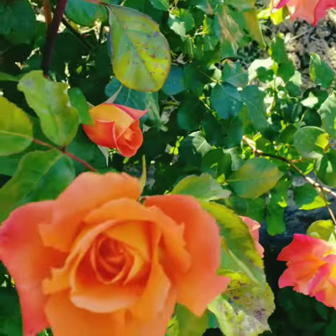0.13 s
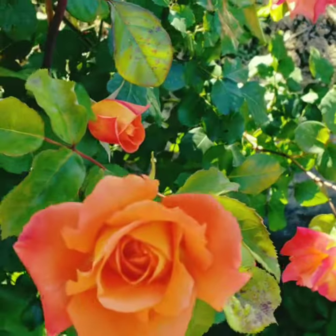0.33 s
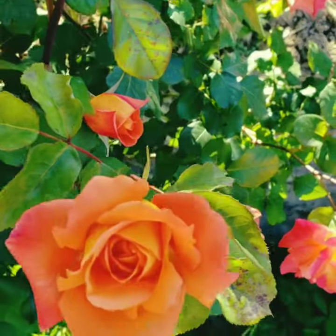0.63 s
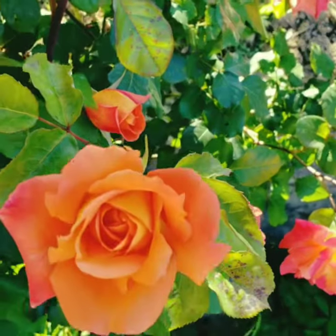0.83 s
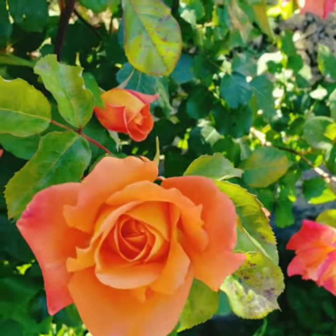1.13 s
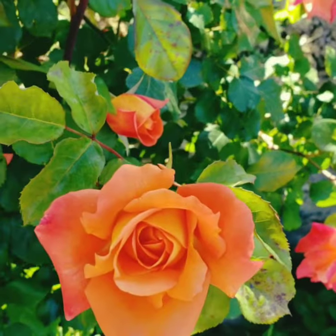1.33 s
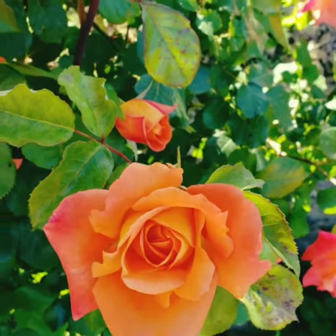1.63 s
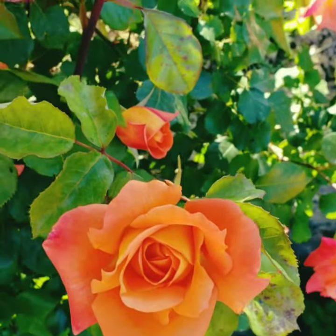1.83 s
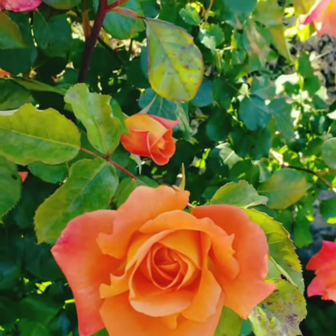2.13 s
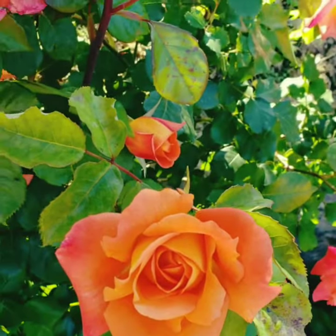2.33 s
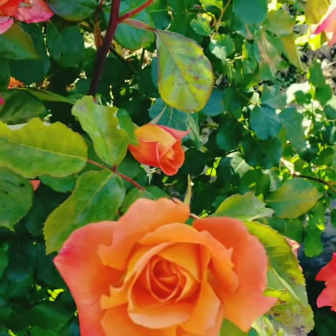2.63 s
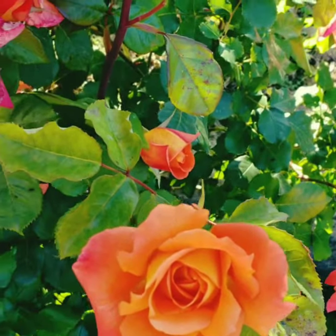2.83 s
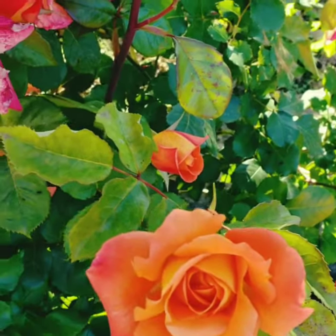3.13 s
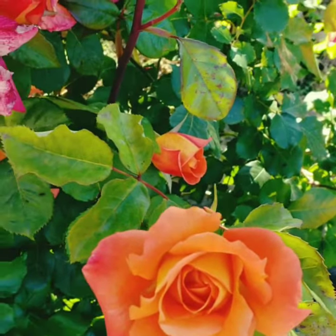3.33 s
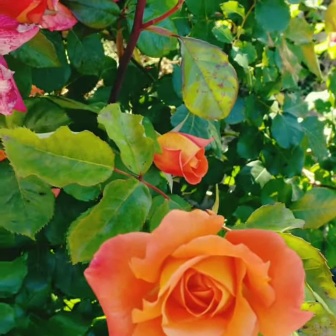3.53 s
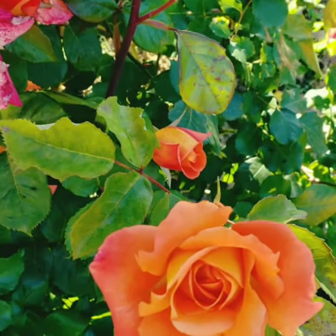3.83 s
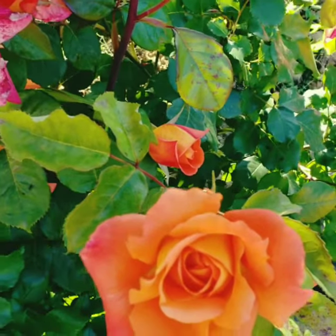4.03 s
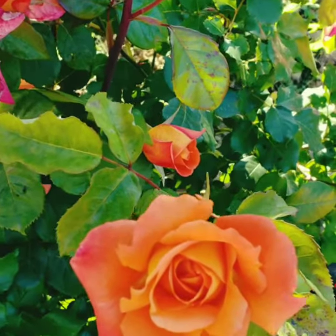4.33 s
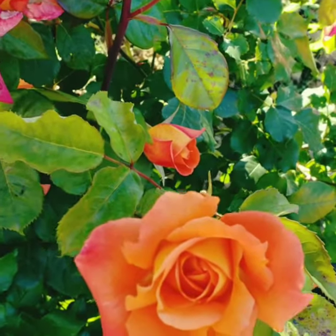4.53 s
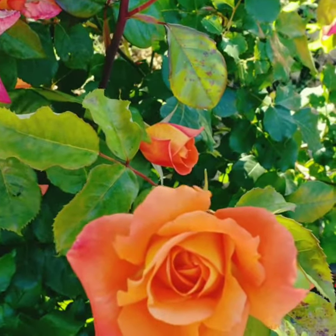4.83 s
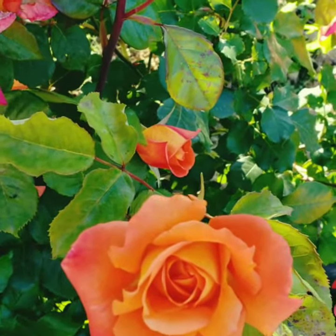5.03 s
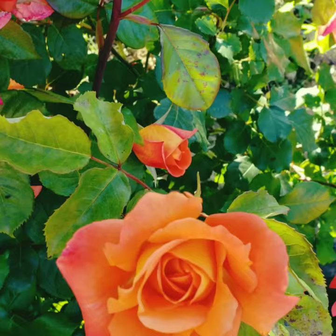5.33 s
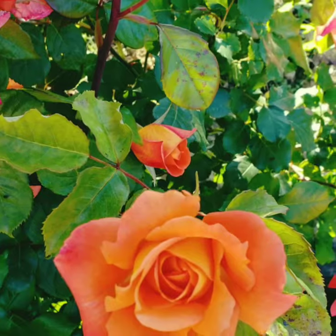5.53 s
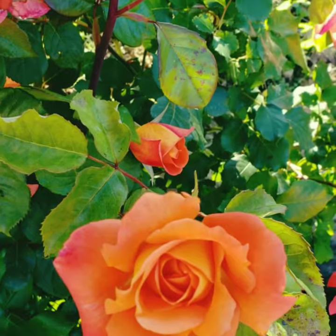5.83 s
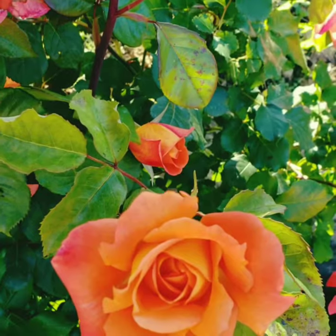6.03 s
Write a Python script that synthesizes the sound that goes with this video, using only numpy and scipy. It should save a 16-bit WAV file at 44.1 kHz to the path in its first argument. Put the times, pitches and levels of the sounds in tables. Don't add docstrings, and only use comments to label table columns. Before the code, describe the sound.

Sharp two-part sparrow chirps ring off garden walls over faint traffic rumble, airy hiss, thin high cricket trills, soft wind puffs and faint dove hoots.

```python
import sys
import numpy as np
from scipy import signal
from scipy.fft import rfft, irfft, next_fast_len
from scipy.io import wavfile
from scipy.ndimage import uniform_filter1d, map_coordinates

SR = 44100
rng = np.random.default_rng(int(sys.argv[2]) if len(sys.argv) > 2 else 0)


def ratio_of_db(decibels):
    return 10 ** (np.asarray(decibels, float) / 20)


def wav_out(sig):
    wavfile.write(sys.argv[1], SR, np.round(np.clip(np.atleast_2d(sig).T, -1, 1) * 32767).astype(np.int16))


N = 272538

# (time from onset [s], pitch [Hz], level [dB])
FALLING_SHAPE = [
    [(-.04, 3800, -62), (0, 3940, -10), (.007, 4900, 1.5), (.02, 5000, -0.5), (.029, 5240, 5), (.038, 4960, 3.5), (.058, 4890, 8.5), (.072, 4900, -26), (.085, 4900, -53)],
    [(.026, 4950, -45), (.031, 4840, -4), (.038, 4050, 1), (.05, 3970, 3), (.07, 4010, 4.5), (.088, 3780, -0.5), (.1, 3210, 6), (.112, 3120, -3), (.124, 3080, -47)],
]
TWO_STEP_SHAPE = [
    [(-.045, 3600, -40), (-.025, 3680, -21.5), (0, 3800, -8), (.008, 5200, -3), (.022, 5128, -4.5), (.034, 4980, 8.5), (.055, 4950, -9), (.066, 4930, -18), (.076, 4900, -39)],
    [(.032, 4900, -38), (.037, 4650, -4), (.045, 4100, 3.5), (.06, 4100, -3), (.076, 3950, -2.5), (.087, 3550, 0), (.1, 3850, 5.5), (.113, 4080, 6), (.124, 4100, -47)],
]
# (time [s], upper level [dB], lower level [dB], length factor [-], last pitch raised by [Hz])
FALLING_CHIRPS = [
    (.177, -43.5, -44.5, 0.93, 160),
    (1.725, -44, -43.5, 0.92, 10),
    (3.537, -45.5, -43.5, .98, 8.4),
]
TWO_STEP_CHIRPS = [
    (0.262, -45.5, -46.5, 0.83, 10),
    (1.476, -44, -46, 1.015, 60),
    (2.797, -45, -47, 1.04, 10),
    (4.354, -45, -44.5, 1.01, 370),
    (5.631, -47.5, -45.5, 1.04, 370),
]
# (order [-], level [dB])
OVERTONES = [(2, -24), (3, -24.5)]
# (frequency [Hz], gain [dB])
BEAK = [(1500, -8.5), (2600, 6.5), (3200, 2), (5600, 1), (7200, -16), (8300, -8.5), (9300, -11),
        (11000, 7.5), (13000, -1), (16000, -4)]
# (frequency [Hz], level [dB per Hz])
WINDPIPE = [(1800, -30), (2900, -9), (3700, 11.5), (5000, 4.5), (6400, 3), (7200, 0.5), (9000, -16.5),
            (11000, -13.5), (16000, -21)]
# (time [s], length [s], first pitch [Hz], last pitch [Hz], level [dB])
FAR_NOTES = [(0.598, 0.066, 5670, 5400, -81.5), (0.7, 0.093, 4000, 3680, -84.5),
             (1.711, 0.032, 5550, 5840, -76), (1.907, 0.06, 5590, 5840, -84),
             (3.462, 0.067, 5600, 5680, -79), (3.094, 0.027, 3750, 4330, -86),
             (5.075, 0.056, 3610, 3710, -82), (5.146, .04, 4170, 3970, -75.5),
             (5.362, 0.047, 2700, 2180, -82), (6.068, 0.063, 3360, 3220, -81.5)]
# (time [s], length [s], first pitch [Hz], last pitch [Hz], level [dB])
FAR_RASPS = [
    (1.14, 0.2, 3806, 4430, -83),
    (2.03, 0.18, 4200, 3490, -80),
    (2.198, 0.17, 4350, 4250, -79.5),
    (2.371, 0.1, 3920, 3116, -78.5),
]
# (time [s], length [s], first pitch [Hz], last pitch [Hz], level [dB])
OPEN_NOTES = [(.14, 0.028, 3900, 4400, -93), (1.21, 0.035, 5250, 5200, -85), (2.595, 0.07, 3650, 3500, -81),
              (2.593, 0.11, 5500, 5590, -85.5), (2.64, .025, 6200, 6640, -70),
              (4.92, 0.046, 4980, 4980, -89), (5.06, 0.057, 2790, 2830, -85.5),
              (5.13, 0.042, 2860, 2750, -82), (5.301, 0.043, 2690, 2880, -83),
              (6.099, 0.068, 2550, 2580, -83.5), (6.149, 0.04, 2900, 3280, -76)]
# (time [s], length [s], first pitch [Hz], last pitch [Hz], level [dB])
OPEN_RASPS = [
    (0.093, 0.012, 4800, 3740, -65),
    (2.7, 0.017, 5700, 6600, -66.5),
    (2.749, 0.015, 6340, 6500, -66.5),
    (2.779, 0.055, 6150, 6180, -67.5),
    (4.422, 0.0181, 2132, 3190, -67.5),
    (4.461, .02, 3190, 2110, -70),
]
# (time [s], length [s], first pitch [Hz], last pitch [Hz], level [dB])
CLEAR_NOTES = [
    (6.045, 0.036, 3780, 3260, -68.5),
]
# (direct sound over echo [dB], warble depth [Hz])
NOTE_KINDS = [
    (-3, 262),
    (-9.5, 1100),
    (0.5, 85),
    (-1, 390),
    (11, 30),
]
# (frequency [Hz], time to fall 60 dB [s])
WALL_ECHOES = [(2500, 0.3), (4000, 0.32), (5500, 0.37), (8000, 0.51), (12000, 0.31)]
# (delay [s], delay [s])
FLAT_WALL_DELAYS = (.044, 0.035)
# (frequency [Hz], left over right [dB])
PORTS = [(60, 1.5), (110, -1), (200, 2), (380, 1.5), (700, 5), (1290, 0), (2380, 1), (4400, 9.5),
         (8120, -4.5), (15000, -1)]
# (frequency [Hz], correlation [-])
ALIKE = [(60, 0.73), (150, 0.95), (380, 0.63), (950, 0.24), (2380, -0.066), (5980, -0.012), (15000, 0.015)]
# (time [s], firing rate [Hz], drone level [dB])
ENGINE = [(.07, 84.23, -64), (.33, 86, -59.5), (.76, 86.25, -76), (1.1, 87.95, -71), (1.3, 89.85, -53.5),
          (1.6, 91.13, -48.5), (1.85, 91.06, -46), (2.15, 92.93, -58), (2.3, 94.2, -54), (3.7, 93, -60),
          (4.1, 91, -63), (4.35, 91, -102)]
# (order 2 level [dB], order 3 level [dB])
HIGHER_ORDERS = [-67.5, -74]
# (time [s], half length [s], order [-], level [dB])
SWELLS = [
    (0.222, 0.076, 2, -61),
    (.85, 0.082, 2, -67),
    (1.346, 0.078, 2, -64),
    (1.62, 0.06, 2, -59.5),
    (1.88, 0.062, 2, -67.5),
    (0.982, .12, 3, -74),
    (1.35, 0.11, 3, -65),
    (1.862, 0.056, 3, -66),
    (3.578, 0.057, 3, -76),
]
# (frequency [Hz], level [dB per Hz])
RUMBLE = [(15, -38), (25, -8), (54, 5.5), (182, -4), (237, -9.5), (345, -14.5), (450, -25), (580, -41),
          (990, -120)]
# (frequency [Hz], level [dB per Hz])
TYRES = [(180, -11), (300, -4.5), (393, -7), (588, -4.5), (628, -7.5), (729, -1), (1200, -1), (1910, -10.5),
         (2800, -14.5), (3640, -22), (6160, -120)]
# (time [s], length [s], level [dB])
SONG = [(0.196, 0.17, -74), (0.45, .054, -79), (0.551, 0.091, -76), (0.742, 0.084, -80), (1.372, .044, -80),
        (1.5, .1, -90), (1.659, 0.32, -75.5), (1.997, 0.11, -76), (2.137, .32, -77), (2.49, .05, -76),
        (2.62, 0.16, -78), (2.793, 0.047, -72), (2.856, .19, -74), (3.094, 0.7, -76), (3.798, 0.09, -77),
        (3.9, 0.22, -76), (4.14, 0.12, -75), (4.381, 0.091, -78), (4.894, .115, -76), (5.045, .065, -77),
        (5.551, 0.094, -80), (5.633, 0.13, -75), (5.79, 0.068, -77), (5.948, 0.076, -79), (6.15, .05, -79)]
# (frequency [Hz], level [dB per Hz])
WING = [(13500, -65), (14300, -16), (14650, 11), (15050, 9), (15550, 7), (16000, -16)]
# (frequency [Hz], level [dB per Hz])
BUFFET = [(15, -24), (45, 3.5), (110, -1), (200, -21), (400, -26), (800, -82)]
# (time [s], half length [s], buffet level [dB])
GUSTS = [
    (1.55, 0.17, -83),
    (2.1, 0.2, -68),
    (2.62, 0.1, -65.5),
    (3.12, 0.23, -66),
    (3.6, 0.12, -68),
    (4.0, 0.25, -73),
    (5.03, 0.2, -73.5),
    (5.29, 0.1, -59),
    (5.6, 0.74, -69),
    (6.17, 0.097, -69),
]
# (time [s], peak level [dB], crispness [dB])
PUFFS = [(0.298, -70, 3), (0.819, -49, -14), (1.129, -64, -10), (1.583, -52, -15), (2.021, -46, -14),
         (2.099, -54, -4), (2.261, -47.5, -16), (2.56, -60, 0), (2.668, -42, -12.5), (2.978, -50, -17),
         (3.359, -61, -17), (3.457, -46, -30), (3.52, -49, -24), (3.802, -52.5, -4.5), (4.055, -89, -2),
         (4.419, -64, -10), (4.933, -61.5, 1), (5.096, -49, -17), (5.249, -59, 9), (5.311, -54.5, 0.5),
         (5.368, -59, 5), (5.628, -65, 5), (6.079, -77, -39)]
# (time [s], half length [s], pitch [Hz], level [dB])
HOOTS = [
    (4.963, 0.036, 640, -68.5),
    (4.96, 0.049, 770, -71),
    (5.574, .035, 550, -68.5),
    (5.843, 0.045, 747, -71),
]
# (time [s], peak level [dB], left over right [dB])
SNAPS = [
    (2.2455, -46, 20.5),
]
# (frequency [Hz], level [dB per Hz])
AIR = [(1060, 2), (1800, -15), (3110, -4.5), (3930, -5), (4430, -4), (4980, -2.5), (6660, -7), (7300, -12),
       (13800, -10), (15100, -6.5), (15800, -12.5)]

VOICE_SIZE = 12000
WARBLE_PER_S, CHIRP_BREATH_DB = 76, -17.5
GASP_DB, GASP_S = -24, 0.035
FALLING_WARBLE_HZ, TWO_STEP_WARBLE_HZ = 638, 431
PERCH_PAN_DB = 3
PAUSE_S, LEAD_S, LEAD_LENGTH_S = .6, .021, .055
LEAD_HZ, LEAD_RISE_HZ, LEAD_DB, LEAD_WARBLE_HZ = 5970, 250, -22.5, 400
FLAT_WALL_DB = -6.5
HIGHER_FADE_DB_PER_S, UNSTEADY_DB = 3, 4
NEAREST_S, PASS_S = 1.48, 1.32
RUMBLE_DB, TYRE_DB, RUMBLE_FALLS = -62.5, -67.5, 0.78
SONG_EDGE_S, CALM_DB = 0.033, -80.5
START_S, TOP_HZ = .066, 15770


def birds():
    out = np.zeros((2, N))
    for (upper, lower), chirps, warble_hz in (
            (FALLING_SHAPE, FALLING_CHIRPS, FALLING_WARBLE_HZ),
            (TWO_STEP_SHAPE, TWO_STEP_CHIRPS, TWO_STEP_WARBLE_HZ)):
        for s, upper_db, lower_db, length, raised_hz in chirps:
            stretch = [length, 1, 1]
            ending = np.outer(np.clip(np.arange(len(lower)) - 5, 0, 2) / 2, [0, raised_hz, 0])
            upper_side = np.array(upper) * stretch + [0, 0, upper_db]
            lower_side = np.array(lower) * stretch + [0, 0, lower_db] + ending
            sing(out, s, (upper_side, lower_side), warble_hz, PERCH_PAN_DB, direct_db=-4.5,
                 rasp=0.1054, buzz_db=2.23, breath_db=CHIRP_BREATH_DB)
    last = -np.inf
    for s, _, lower_db, *_ in sorted(FALLING_CHIRPS + TWO_STEP_CHIRPS):
        if s - last > PAUSE_S:
            note(out, s - LEAD_S, LEAD_LENGTH_S, LEAD_HZ, LEAD_HZ + LEAD_RISE_HZ,
                 lower_db + LEAD_DB, -6.5, LEAD_WARBLE_HZ)
        last = s
    groups = (FAR_NOTES, FAR_RASPS, OPEN_NOTES, OPEN_RASPS, CLEAR_NOTES)
    for notes, kind in zip(groups, NOTE_KINDS):
        for row in notes:
            note(out, *row, *kind)
    return filtered(out, lambda hz: ratio_of_db(along(BEAK, hz)))


def note(add, s, length, first_hz, last_hz, db, direct_db, warble_hz):
    share = np.array([0, .2, .8, 1])
    swell_db = np.array([-4, -1.0, -6, 0.5]) + db + 5.5 - max(direct_db, 0)
    sung = np.transpose([share * length, first_hz + share * (last_hz - first_hz), swell_db])
    silent = sung - [0, 0, 200]
    breath_db = warble_hz / 70 - 12.5 - 15 * (warble_hz < 50)
    sing(add, s, (silent, sung), warble_hz, pan_db=7, direct_db=direct_db, rasp=.9,
         buzz_db=min(4, warble_hz / 25), breath_db=breath_db)


def sing(add, s, sides, warble_hz, pan_db, direct_db, rasp, buzz_db, breath_db):
    (upper_s, upper_hz, upper_db), (lower_s, lower_hz, lower_db) = map(np.transpose, sides)
    t = np.arange(VOICE_SIZE) / SR + upper_s[0]
    upper = ratio_of_db(np.interp(t, upper_s, upper_db, right=-200))
    lower = ratio_of_db(np.interp(t, lower_s, lower_db, left=-200, right=-200))
    low_hz = np.interp(t, lower_s, lower_hz)
    ending = np.interp(t, lower_s[-4] + np.array([-.012, .002]), [1, 0.302 + .7 * rasp])
    depth = np.clip((low_hz - 3050) / 700, .1, 1) * ending
    high_hz = np.interp(t, upper_s, upper_hz)
    flow = upper * whistle(t, high_hz, 0.18 * warble_hz, 0.66 * buzz_db, rasp)
    flow = flow + lower * whistle(t - lower_s[1], low_hz, depth * warble_hz, buzz_db, rasp)
    size = upper + lower + 1e-12
    tone = flow + size * sum(ratio_of_db(db) * (flow / size) ** k for k, db in OVERTONES)
    gasp = ratio_of_db(upper_db.max() + GASP_DB - breath_db) * np.exp(-(t / GASP_S) ** 2)
    hz = np.fft.rfftfreq(len(t), 1 / SR)
    breath = irfft(rfft(rng.standard_normal(len(t))) * ratio_of_db(along(WINDPIPE, hz)))
    puffing = ratio_of_db(3.4 * wobble(250, size=VOICE_SIZE))
    tone = tone + ratio_of_db(breath_db) * (size + gasp) * unit(breath) * puffing
    tone = tone * np.clip((t - t[0]) / 0.0038, 0, 1)
    heard = signal.fftconvolve(tone[None], garden(direct_db), axes=1) * panned(pan_db)
    place = add[:, round((s + upper_s[0]) * SR):]
    place[:, :heard.shape[1]] += heard[:, :place.shape[1]]


def whistle(t, hz, warble_hz, buzz_db, rasp):
    even = np.cos(2 * np.pi * WARBLE_PER_S * t + 0.29 * wobble(30.13, size=VOICE_SIZE))
    warble = (1 - rasp) * even + rasp * wobble(500, size=VOICE_SIZE)
    beats = np.cos(2 * np.pi * 185 * t + 4.66 * wobble(58.7, size=VOICE_SIZE))
    flutter = ratio_of_db(buzz_db * (1.015 * wobble(703.7, size=VOICE_SIZE) + 1.5 * beats))
    return flutter * np.cos(2 * np.pi * np.cumsum(hz + warble_hz * warble) / SR)


def garden(direct_db):
    size = 22000
    hz, t, z = signal.stft(rng.standard_normal((2, size)), SR, nperseg=256)
    near = ratio_of_db(-60 * t / along(WALL_ECHOES, hz)[:, None])
    far = ratio_of_db(-8.5 - 60 * t / 0.7)
    build_up = 1 - np.exp(-t / 0.00061)
    tail = signal.istft(z * (near + far) * build_up, SR, nperseg=256)[1][:, :size]
    tail = tail * ratio_of_db(3.54 * np.array([wobble(298.3, size=size), wobble(299.3, size=size)]))
    tail = tail / np.linalg.norm(tail[0])
    tail[[0, 1], [0, 8]] = ratio_of_db(direct_db)
    tail[[0, 1], [round(s * SR) for s in FLAT_WALL_DELAYS]] += ratio_of_db(direct_db + FLAT_WALL_DB)
    return tail


def traffic():
    hz, drone_db = curves(ENGINE)
    t = np.arange(N) / SR
    phase = 2 * np.pi * np.cumsum(hz + 0.4 * wobble(3.82)) / SR
    gone_db = np.interp(t, [4.1, 4.4], [0, -40])
    paths = np.array([wobble(2.23), wobble(3.71)])
    sizes = [ratio_of_db(drone_db + 0.41 * wobble(6.9))]
    for order, db in enumerate(HIGHER_ORDERS, 2):
        swells = humps([(s, half, peak_db) for s, half, k, peak_db in SWELLS if round(k) == order])
        sizes.append(ratio_of_db(db - HIGHER_FADE_DB_PER_S * t + UNSTEADY_DB * wobble(6.375)) + swells)
    drone = sum(ratio_of_db(1.0 + gone_db) * size * np.sin(order * phase + 0.15 * paths)
                for order, size in enumerate(sizes, 1))
    far_db = -10 * np.log10(1 + ((t - NEAREST_S) / PASS_S) ** 2)
    rumble_size = ratio_of_db(RUMBLE_DB + RUMBLE_FALLS * far_db + 2.2 * wobble(3.31))
    tyre_size = ratio_of_db(TYRE_DB + far_db + 3.0 + 0.15 * wobble(3.86))
    rumble = rumble_size * rush(RUMBLE, patchy_db=0.0)
    return drone + rumble + tyre_size * rush(TYRES, patchy_db=2.0)


def cricket():
    turns = np.cumsum(65.0 + 1.5 * wobble(9.0)) / SR
    alternate = 0.64 * np.cos(np.pi * turns)
    strokes = ratio_of_db(3 * np.cos(2 * np.pi * turns) + alternate + 0.91 * wobble(90))
    wing = filtered(rng.standard_normal((2, N)), lambda hz: ratio_of_db(along(WING, hz)))
    t = np.arange(N) / SR
    bursts = sum(ratio_of_db(db) * np.clip(np.minimum(t - s, s + length - t) / SONG_EDGE_S + .3, 0, 1)
                 for s, length, db in SONG)
    return bursts * ratio_of_db(0.92 * wobble(12)) * unit(strokes * wing) * ratio_of_db([[5.5], [-14]])


def wind():
    buffet = unit(filtered(rng.standard_normal((2, N)), lambda hz: ratio_of_db(along(BUFFET, hz))))
    strength = (ratio_of_db(CALM_DB) + humps(GUSTS)) * ratio_of_db(1.5 + 0.75 * wobble(22))
    out = strength * buffet * ratio_of_db([[4], [-8]])
    t = np.arange(4000) / SR
    for s, db, crisp_db in PUFFS:
        swell = np.exp(-((t - .035) / 0.013) ** 2)
        push = np.sin(2 * np.pi * 48 * t + rng.uniform(0, 2 * np.pi))
        rattle = ratio_of_db(crisp_db + 9.0) * wobble(262.0, size=4000)
        puff = ratio_of_db(db) * swell * (push + rattle)
        place = out[:, round(s * SR) - 400:][:, :4000]
        place += puff[:place.shape[1]] * ratio_of_db([[0], [-17]])
    return out


def dove():
    t = np.arange(N) / SR
    return sum(humps([(s, half, db)]) * np.sin(2 * np.pi * hz * t + 2.7 * wobble(30))
               for s, half, hz, db in HOOTS)


def twig():
    out = np.zeros((2, N))
    t = np.arange(200) / SR
    for s, db, pan_db in SNAPS:
        snap = ratio_of_db(db + 5.0 - 60 * t / 0.0012) * np.cos(2 * np.pi * 2600 * t)
        out[:, round(s * SR):][:, :len(t)] += snap * panned(pan_db)
    return filtered(out, lambda hz: 1 / (1 + (1200 / (hz + 1)) ** 4) / (1 + (hz / 7000) ** 6))


def air():
    return ratio_of_db(-71.0) * rush(AIR, patchy_db=.8) * ratio_of_db(.6 * wobble(3))


def rush(spectrum, patchy_db):
    z = signal.stft(rng.standard_normal((2, N)), nperseg=512)[2]
    patches = uniform_filter1d(rng.standard_normal(z.shape[1:]), 6, 0)
    patches = unit(uniform_filter1d(patches, 14, 1))
    pair = signal.istft(z * ratio_of_db(patchy_db * patches), nperseg=512)[1][:, :N]

    def middle_and_side(hz):
        turn = np.arccos(np.clip(along(ALIKE, hz), -1, 1)) / 2
        return ratio_of_db(along(spectrum, hz)) * [np.cos(turn), np.sin(turn)]

    mid, side = filtered(pair, middle_and_side)
    return unit(np.array([mid + side, mid - side]))


def humps(rows):
    t = np.arange(N) / SR
    return sum(ratio_of_db(db) * np.exp(-((t - s) / half) ** 2) for s, half, db in rows)


def panned(db):
    return ratio_of_db([[db / 2], [-db / 2]])


def unit(x):
    return x / np.sqrt(np.mean(x ** 2) + 1e-20)


def along(points, hz):
    f, v = np.transpose(points)
    return np.interp(np.log(hz + 1), np.log(f + 1), v)


def curves(rows):
    s, *columns = np.transpose(rows)
    return [np.interp(np.arange(N) / SR, s, column) for column in columns]


def wobble(rate, size=N):
    knots = rng.standard_normal(int(size * rate / SR) + 4)
    return map_coordinates(knots, [np.arange(size) * rate / SR])


def filtered(x, response):
    m = next_fast_len(N + 8192)
    return irfft(rfft(x, m) * response(np.fft.rfftfreq(m, 1 / SR)), m)[..., :N]


def scene():
    halves = np.array([[.5], [-.5]])
    low_ports = lambda hz: ratio_of_db(0.85 * along(PORTS, np.minimum(hz, 3000)) * halves)
    high_ports = lambda hz: ratio_of_db(4.3 * along(PORTS, hz) * (hz > 6500) * halves)
    ground = filtered(traffic() + air(), low_ports)
    return filtered(birds(), high_ports) + ground + wind() + cricket() + twig() + dove()


def roll_off(x):
    return signal.sosfilt(signal.butter(12, 16880, fs=SR, output="sos"), x)


def record(dry):
    opened = dry * np.clip((np.arange(N) / SR - START_S) / 0.0045, 0, 1)
    mix = filtered(opened, lambda hz: hz < TOP_HZ)
    return roll_off(mix)


dry = scene()
out = record(dry)
wav_out(out)
```